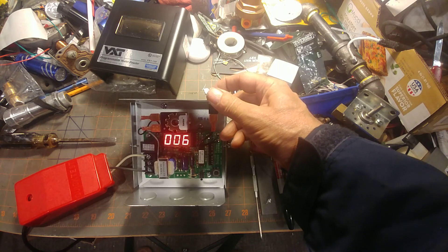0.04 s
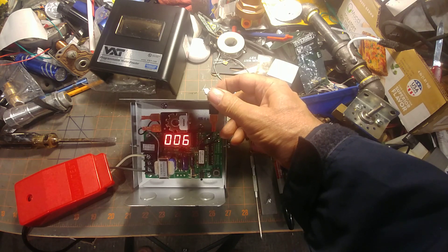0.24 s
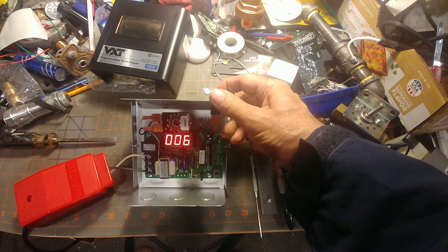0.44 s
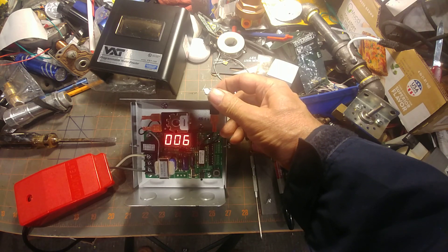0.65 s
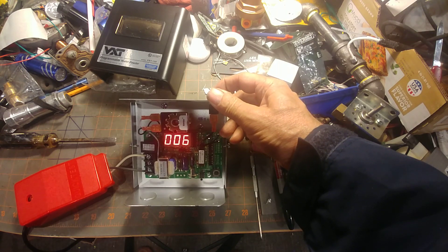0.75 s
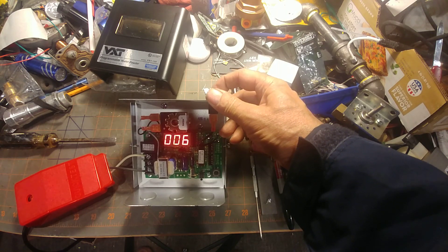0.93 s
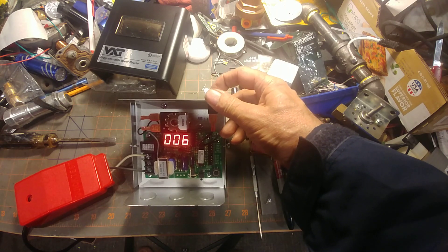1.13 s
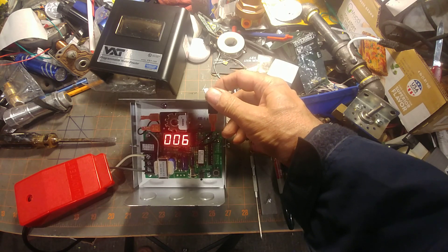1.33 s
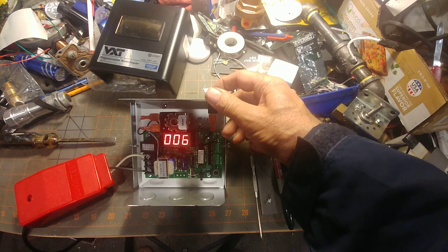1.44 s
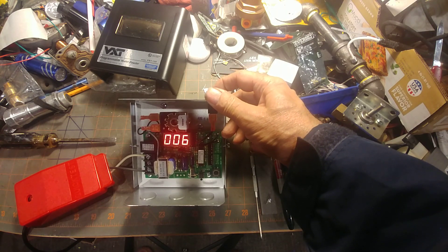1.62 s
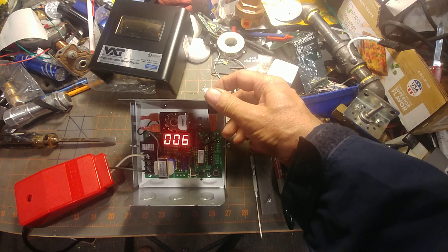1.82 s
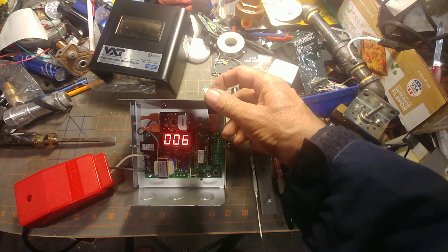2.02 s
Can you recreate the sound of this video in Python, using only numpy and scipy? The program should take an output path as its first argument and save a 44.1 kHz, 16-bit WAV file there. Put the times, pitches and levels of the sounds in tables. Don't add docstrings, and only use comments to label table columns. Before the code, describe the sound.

A solenoid valve clacks open sharply, hums and sputters, then clicks shut, twice, on a bench.

```python
import sys
import numpy as np
from scipy import signal
from scipy.fft import rfft, irfft, next_fast_len
from scipy.io import wavfile
from scipy.ndimage import map_coordinates

SR = 44100
rng = np.random.default_rng(int(sys.argv[2]) if len(sys.argv) > 2 else 0)


def waveform_to_disk(signal):
    frames = np.transpose(np.atleast_2d(signal))
    scaled = np.clip(frames, -1, 1) * 32767
    samples = np.round(scaled).astype(np.int16)
    wavfile.write(sys.argv[1], SR, samples)


def field_ratio(decibels):
    return 10 ** (np.asarray(decibels, dtype=float) / 20)


N = 91331

# (frequency [Hz], level [dB])
AIR_TONE = [(29, -33.5), (50, -0.5), (250, -10), (275, -10), (310, -12), (1280, -19.5), (15500, -29.5)]
# (time [s], length [s], level [dB])
BRUSHES = [
    (0.089, 0.029, -57),
    (1.368, 0.037, -42),
]
# (time [s], peak [dB])
RELAY_CLOSES = [
    (0.1478, -17),
    (0.1515, -23),
    (0.1543, -23),
    (1.3955, -14),
    (1.3995, -20),
    (1.402, -19),
    (1.4065, -26),
]
# (frequency [Hz], level [dB])
RELAY_CLOSE_TONE = [(300, -59), (1450, -11), (2240, -23.5), (4460, 5.5), (8440, -22), (16000, -18)]
# (frequency [Hz], width [Hz], level [dB])
RELAY_CLOSE_RING = [(1518, 150, -9.5), (5070, 280, 3), (7700, 520, -5)]
# (time [s], peak [dB])
SLAMS = [
    (0.1605, -4),
    (0.164, -15),
    (0.1685, -19),
    (1.4113, -2.5),
    (1.415, -14),
    (1.419, -18),
    (1.4415, -27),
]
# (frequency [Hz], level [dB])
SLAM_TONE = [(300, -43), (750, -10.5), (2400, 5), (3190, -7), (6670, -7.5), (9500, -17.5), (16000, -9.5)]
# (frequency [Hz], width [Hz], level [dB])
SLAM_RING = [(830, 90, -19), (1055, 60, -11), (1270, 120, -17), (2430, 160, -7), (2630, 110, -11),
             (4050, 160, -7), (4250, 250, -9), (6440, 350, 0), (6900, 400, -1), (7900, 500, -3),
             (9100, 450, -5)]
# (time [s], peak [dB], tilt [dB/octave])
BLOWS = [
    (0.1608, -24, 0),
    (1.4115, -22.5, 0),
    (0.9725, -39, 2),
    (1.0106, -36, 0),
    (2.0107, -33, 2),
    (2.0215, -36, 0),
    (2.0562, -36, 0),
]
# (frequency [Hz], level [dB], t60 [s])
HOUSING_MODES = [(815, -7, .06), (1055, -1, .07), (1260, -9, .04), (1700, -13, .03), (2330, -4, .05),
                 (2426, 0, .07), (2625, -5, .05), (4000, -1, .05), (4240, -10, .035)]
# (opens [s], shuts [s])
VALVE_OPEN = [
    (0.162, 1.03),
    (1.417, 2.2),
]
# (multiple of hum [-], level re hum [dB])
HUM_OVERTONES = [(2, -32.5), (3, -30.5)]
# (frequency [Hz], level [dB])
RUMBLE_TONE = [(30, -33), (60, 1.5), (85, -11), (180, -9.5), (350, -5.5), (500, -19), (2000, -26)]
# (time [s], level [dB])
HISS = [(0.2, -38), (0.35, -74), (0.438, -80), (0.62, -43.5), (0.76, -51), (0.885, -84), (0.93, -68.5),
        (1.45, -58), (1.52, -55), (1.6, -46.5), (2.0, -52)]
# (time [s], peak [dB])
CHATTER = [(0.2306, -33), (0.2568, -35.5), (0.2745, -38), (0.2919, -36), (0.3053, -46.5), (0.3319, -33),
           (0.36, -29.5), (0.397, -33.5), (0.4483, -33.5), (0.4806, -33.5), (0.4992, -26.5),
           (0.5402, -36.5), (0.5566, -35), (0.573, -38), (0.6, -27), (0.6177, -20), (0.6603, -21),
           (0.7161, -34), (0.7307, -30.5), (0.7478, -43.5), (0.7658, -33.5), (0.7858, -34.5), (0.7977, -41),
           (0.8164, -36.5), (0.831, -42), (0.8476, -47), (0.864, -60), (0.892, -31.5), (0.9457, -37.5),
           (1.49, -30.5), (1.4978, -30), (1.5334, -37), (1.5538, -20), (1.5661, -30.5), (1.5816, -30),
           (1.5968, -38.5), (1.631, -28), (1.6467, -40), (1.664, -32), (1.6776, -45), (1.715, -32),
           (1.7345, -32), (1.7634, -31), (1.7834, -29.5), (1.7974, -30), (1.8116, -34), (1.851, -33.5),
           (1.8658, -32.5), (1.8835, -32.5), (1.8974, -26), (1.915, -41), (1.932, -31), (1.9473, -30),
           (1.963, -26)]
# (time [s], peak [dB])
FIRST_SPITS = [(0.2570, -36), (0.3063, -28.5), (0.3311, -57), (0.3680, -20.5), (0.396, -34.5),
               (0.4575, -22.5), (0.4654, -36), (0.4994, -30.5), (0.6010, -22), (0.6183, -25.5),
               (0.6322, -21), (0.6404, -43), (0.6484, -33.5), (0.6600, -20), (0.7311, -38), (0.764, -36),
               (0.891, -35), (0.9012, -25.5), (0.9460, -36)]
# (time [s], peak [dB])
SECOND_SPITS = [(1.4902, -44.5), (1.5325, -23.5), (1.5540, -30), (1.5644, -39), (1.6312, -34),
                (1.6640, -34.5), (1.6777, -23.5), (1.7142, -38), (1.7325, -34.5), (1.7650, -36),
                (1.8115, -23), (1.8492, -33), (1.8828, -34), (1.9153, -54), (1.9327, -29.5),
                (1.9620, -24.5)]
# (frequency [Hz], level [dB])
FLOW_TONE = [(300, -46), (600, -11.5), (1250, -13), (2900, -16.5), (4620, -5.5), (7710, 5.5), (10300, -3.5),
             (16000, -6.5)]
# (frequency [Hz], width [Hz], level [dB])
BODY_RING = [(1216, 86.5, -2.5), (1540, 300, -10), (4106, 53, -7), (5230, 360, -22.5), (5860, 71, 2.5),
             (6164, 300, -3.5), (7760, 120, -8.5), (7420, 165, 5), (8010, 220, -7.5), (9370, 830, -1.5)]
# (time [s], peak [dB])
RELAY_OPENS = [(0.9655, -24.5), (0.9722, -17), (0.9755, -22), (0.9825, -25), (1.9995, -32), (2.006, -22.5),
               (2.0105, -11.5), (2.014, -12.5), (2.0185, -20), (2.0215, -46.5), (2.030, -27.5)]
# (frequency [Hz], level [dB])
RELAY_OPEN_TONE = [(300, -17.5), (1600, -15), (3100, -6), (5100, -8), (9500, -10), (16000, -8.5)]
# (frequency [Hz], width [Hz], level [dB])
RELAY_OPEN_RING = [(1423, 90, -12.5), (2380, 197, -1), (4060, 140, 1.5), (5024, 360, 1), (6060, 640, -10.5),
                   (7130, 320, -2.5)]
# (time [s], peak [dB])
DROPS = [
    (1.0105, -19),
    (1.0135, -22),
    (1.023, -27),
    (2.056, -17),
    (2.059, -21),
]
# (frequency [Hz], level [dB])
DROP_TONE = [(300, -9.5), (1500, -17), (3000, -8.5), (4500, -16), (16000, -9)]
# (frequency [Hz], width [Hz], level [dB])
DROP_RING = [(1580, 570, -11.5), (2340, 43, 4), (4020, 660, -13.5), (4860, 1100, -11), (6470, 440, -9),
             (7900, 110, -4.5)]
# (time [s], peak [dB])
KNOCKS = [
    (2.0258, -19.5),
    (2.0317, -11),
    (2.0353, -13.5),
    (2.04, -17),
]
# (frequency [Hz], width [Hz], level [dB])
BENCH_RING = [(159.3, 20, 1.5), (279, 130, -40), (450, 300, -12)]
# (frequency [Hz], left over right [dB])
PORT_BALANCE = [(100, -4), (1500, -5), (3200, -2.5), (5000, -4.5), (7000, -6), (8600, -14), (11500, -3),
                (15000, -3)]
# (frequency [Hz], phase [rad])
PORT_PHASE = [(150, .3), (500, .35), (1500, .4), (2500, 1.1), (5000, 1.5), (9000, 1.3), (14000, 1.7)]
# (frequency [Hz], t60 [s])
ROOM_T60 = [(200, 0.4), (2000, 0.13), (10000, 0.18)]
# (frequency [Hz], gain [dB])
OVERALL_TONE = [(20, -34), (60, 0), (10000, -2.5), (10900, -11.5), (12000, -6.5), (15200, -3), (15900, -11),
                (16150, -27)]
# (frequency [Hz], level re loud treble [dB])
MASK = [(10500, -32), (11400, -28.5), (12000, -35.5), (14800, -35), (15400, -35.5)]


def unit(x):
    return x / np.sqrt(np.mean(x ** 2) + 1e-20)


def along(points, hz):
    f, v = np.transpose(points)
    return np.interp(np.log(hz + 1), np.log(f + 1), v)


def wobble(rate_hz):
    knots = rng.standard_normal(int(N * rate_hz / SR) + 4)
    return map_coordinates(knots, [np.arange(N) * rate_hz / SR])


def filtered(x, response):
    m = 2 * next_fast_len(N // 2 + SR // 4)
    return irfft(rfft(x, m) * response(np.fft.rfftfreq(m, 1 / SR)), m)[..., :N]


def causal(h):
    c = irfft(np.log(abs(h) + 1e-6))
    c[1:len(c) // 2] *= 2
    c[len(c) // 2 + 1:] = 0
    return np.exp(rfft(c))


def resonance(f, centre_hz, width_hz, db):
    damping = 1j * f * width_hz
    return field_ratio(db) * damping / (centre_hz ** 2 - f * f + damping)


def body(tone, ring, ring_db):
    def response(f):
        modes = sum((-1) ** k * resonance(f, *mode) for k, mode in enumerate(ring))
        h = causal(field_ratio(along(tone, f))) + field_ratio(ring_db) * modes
        return h / np.sqrt(np.mean(abs(h) ** 2))
    return response


def bursts(events, rise_s, hold_s, t60_s, crack_db, grit_db):
    t = np.arange(SR // 4) / SR
    decay_s = np.clip(t - rise_s - hold_s, 0, 9)
    shape = np.clip(t / rise_s, 0, 1) * field_ratio(-60 * decay_s / t60_s)
    crack = np.clip(t / 0.0003, 0, 1) * np.exp(-t / 0.0008)
    shape = shape + field_ratio(crack_db) * crack
    env = np.zeros(N + SR)
    for s, db in events:
        env[round(s * SR):][:len(t)] += field_ratio(db) * shape
    noise = rng.uniform(-0.88, 1, N)
    grit = field_ratio(grit_db * wobble(2500))
    return env[:N] * unit(noise * grit)


def valve_gate(rise_s, fall_s):
    t = np.arange(N) / SR
    return sum(np.clip((t - a) / rise_s, 0, 1) * np.clip((b - t) / fall_s + 1, 0, 1)
               for a, b in VALVE_OPEN)


def air():
    alike, level_db = 0.074, -65.5
    a, b = rng.standard_normal((2, N))
    u = np.arccos(alike) / 2
    pair = np.array([np.cos(u) * a + np.sin(u) * b, np.cos(u) * a - np.sin(u) * b])
    balance = field_ratio(np.array([[-0.8], [0.8]]))
    return field_ratio(level_db) * balance * unit(filtered(pair, lambda f: field_ratio(along(AIR_TONE, f))))


def finger_brush():
    t = np.arange(N) / SR
    env = sum(field_ratio(db) * np.clip((t - s) / 0.017, 0, 1) * np.clip((s + length_s - t) / 0.0045, 0, 1)
              for s, length_s, db in BRUSHES)
    return filtered(env * rng.standard_normal(N),
                    lambda f: (f / 3000) / (1 + f / 3000) / (1 + (f / 8000) ** 6))


def relay_close():
    contact = bursts(RELAY_CLOSES, rise_s=0.0015, hold_s=0.00027, t60_s=0.016, crack_db=-11, grit_db=0)
    return field_ratio(-3.5) * filtered(contact, body(RELAY_CLOSE_TONE, RELAY_CLOSE_RING, ring_db=5))


def plunger_slam():
    impact = bursts(SLAMS, rise_s=0.00047, hold_s=0.00035, t60_s=0.018, crack_db=-11, grit_db=0)
    return field_ratio(-7) * filtered(impact, body(SLAM_TONE, SLAM_RING, ring_db=9.7))


def housing():
    out, t = np.zeros(N + SR), np.arange(SR // 4) / SR
    rise = 1 - np.exp(-t / 0.001)
    for s, blow_db, tilt_db in BLOWS:
        ring = 0
        for hz, mode_db, t60_s in HOUSING_MODES:
            db = blow_db + mode_db + tilt_db * np.log2(hz / 2400) - 60 * t / t60_s
            ring = ring + field_ratio(db) * np.sin(2 * np.pi * (hz * t + rng.random()))
        out[round(s * SR):][:len(t)] += rise * ring
    return out[:N]


def coil():
    hum_hz, hum_db, rumble_db = 119.9, -47, -54
    phase = 2 * np.pi * hum_hz * np.arange(N) / SR + 0.19 * wobble(4.2)
    hum = np.sin(phase)
    for k, db in HUM_OVERTONES:
        hum = hum + field_ratio(db + 2.7 * wobble(13)) * np.sin(k * phase)
    rumble = unit(filtered(rng.standard_normal(N), lambda f: field_ratio(along(RUMBLE_TONE, f))))
    return (field_ratio(hum_db + wobble(4)) * hum * valve_gate(0.03, 0.033)
            + field_ratio(rumble_db + 0.68 * wobble(3)) * rumble * valve_gate(0.022, 0.056))


def flow():
    s, db = np.transpose(HISS)
    hiss_db = 1.5 * wobble(55) + 4 * wobble(760) + np.interp(np.arange(N) / SR, s, db)
    hiss = field_ratio(hiss_db - 2) * valve_gate(0.004, 0.012) * rng.standard_normal(N)
    chatter = field_ratio(-11) * bursts(CHATTER, rise_s=0.0005, hold_s=0.001, t60_s=0.045, crack_db=14, grit_db=1.5)
    spits = field_ratio(-10.5) * bursts(list(FIRST_SPITS) + list(SECOND_SPITS), rise_s=0.0043, hold_s=0.0047,
                                t60_s=0.053, crack_db=5.54, grit_db=4.3)
    gentle = filtered(hiss + chatter, lambda f: field_ratio(-14 / (1 + (10600 / (f + 1)) ** 20)))
    return filtered(gentle + spits, body(FLOW_TONE, BODY_RING, ring_db=6.5))


def relay_open():
    contact = bursts(RELAY_OPENS, rise_s=0.0015, hold_s=0.00071, t60_s=0.038, crack_db=2, grit_db=0)
    return field_ratio(-6.5) * filtered(contact, body(RELAY_OPEN_TONE, RELAY_OPEN_RING, ring_db=8.7))


def plunger_drop():
    impact = bursts(DROPS, rise_s=0.0005, hold_s=0.0012, t60_s=0.025, crack_db=2, grit_db=0)
    return field_ratio(-8.5) * filtered(impact, body(DROP_TONE, DROP_RING, ring_db=8.7))


def bench_knock():
    push_s, bench_db = 0.0021, 7.5
    t = np.arange(N) / SR
    push = sum(field_ratio(db) * np.sin(np.pi * np.clip((t - s) / push_s, 0, 1)) ** 2 for s, db in KNOCKS)
    return field_ratio(bench_db) * filtered(push, lambda f: sum(resonance(f, *mode) for mode in BENCH_RING))


def ports(x):
    step_hz = 400
    knots = rng.standard_normal(SR // step_hz)

    def response(f):
        side = np.array([[0.5], [-0.5]])
        turn = np.tanh(2 * map_coordinates(knots, [f / step_hz]))
        pair = field_ratio(side * along(PORT_BALANCE, f)) * np.exp(1j * side * along(PORT_PHASE, f) * turn)
        return pair / np.maximum(abs(pair.mean(axis=0)), 0.3)
    return filtered(x, response)


def room(x):
    hz, t, z = signal.stft(rng.standard_normal((2, SR // 3)), SR, nperseg=256)
    decay = field_ratio(-60 * t / along(ROOM_T60, hz)[:, None])
    tail = signal.istft(z * decay, SR, nperseg=256)[1]
    delayed = np.pad(x, (150, 0))[None]
    return signal.fftconvolve(delayed, tail / np.linalg.norm(tail[0]), axes=1)[:, :N]


def masked(x):
    from_hz, scatter_db, slope = 10400, 5.5, 0.76
    hz, _, z = signal.stft(x, SR, nperseg=2048)
    band = (abs(z[:, :1024]) ** 2).reshape(2, 32, 32, -1).mean(axis=(0, 2))
    treble = band[8:14].mean(axis=0)
    share_db = along(MASK, hz[16:1024:32])[:, None] + scatter_db * rng.standard_normal(band.shape)
    threshold = treble ** slope * field_ratio(2 * share_db)
    keep = np.clip(2 * (band / (threshold + 1e-20)) ** 2 - 1, 0.03, 1)
    keep = keep[np.minimum(np.arange(len(hz)) // 32, 31)]
    gain = np.where(hz[:, None] > from_hz, keep, 1)
    return signal.istft(z * gain, SR, nperseg=2048)[1][:, :N]


def scene():
    hits = relay_close() + plunger_slam() + relay_open() + plunger_drop() + housing()
    spit = flow()
    spit_room = field_ratio(-9) * room(spit)
    direct_hits = ports(hits)
    direct_steady = ports(spit + coil() + finger_brush() + bench_knock())
    hits_room = field_ratio(-6.5) * room(hits)
    return direct_hits + direct_steady + hits_room + spit_room + air()


def band_limit(x):
    return signal.sosfilt(signal.butter(12, 16950, fs=SR, output="sos"), x)


def record(dry):
    overload = 1.1
    x = filtered(dry, lambda f: field_ratio(along(OVERALL_TONE, f)))
    mix = masked(overload * np.tanh(x / overload))
    return band_limit(mix)


dry = scene()
out = record(dry)
waveform_to_disk(out)
```